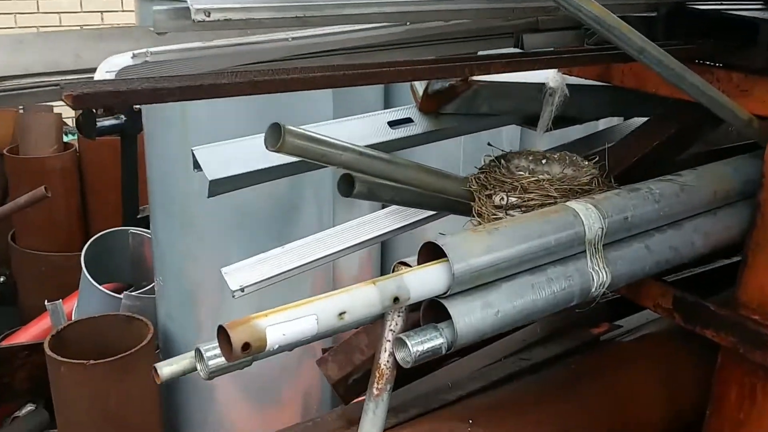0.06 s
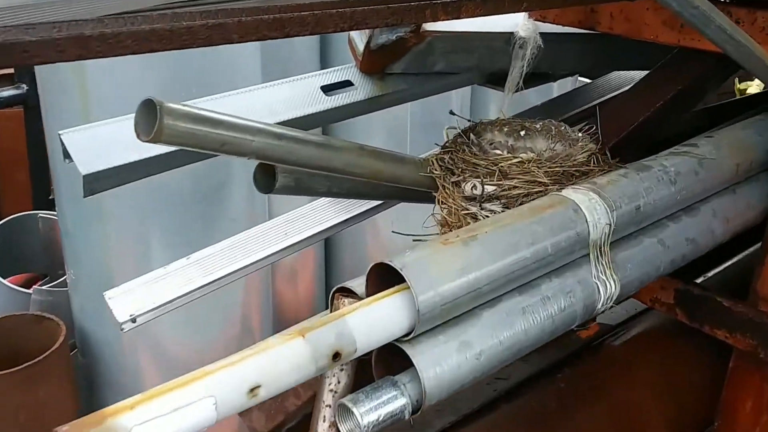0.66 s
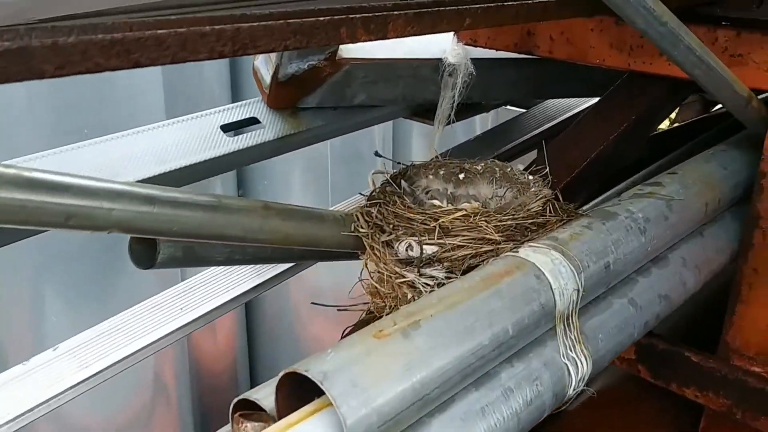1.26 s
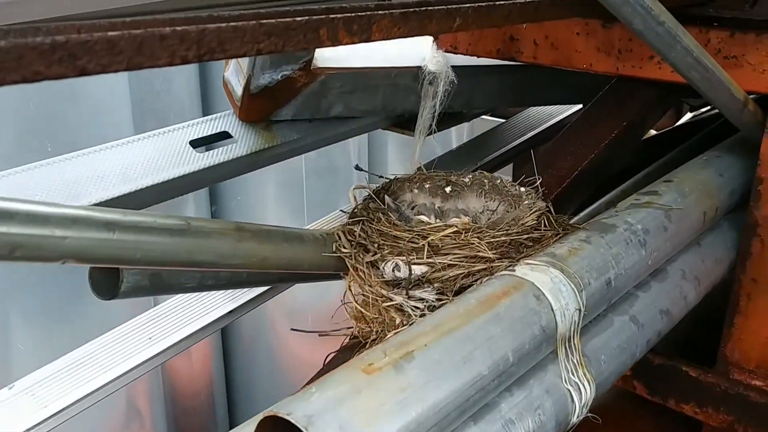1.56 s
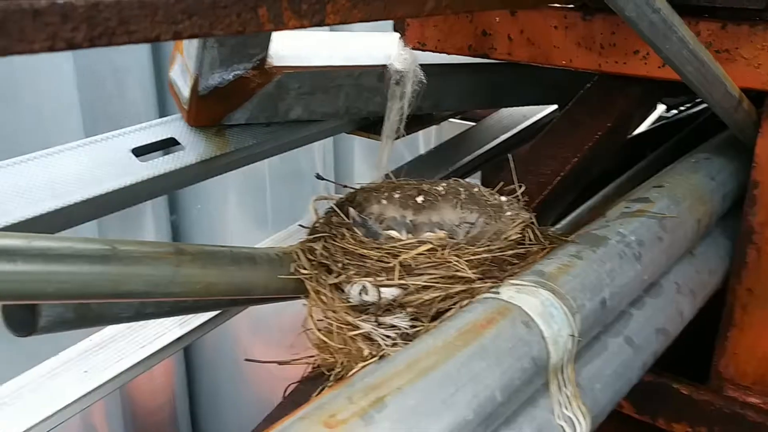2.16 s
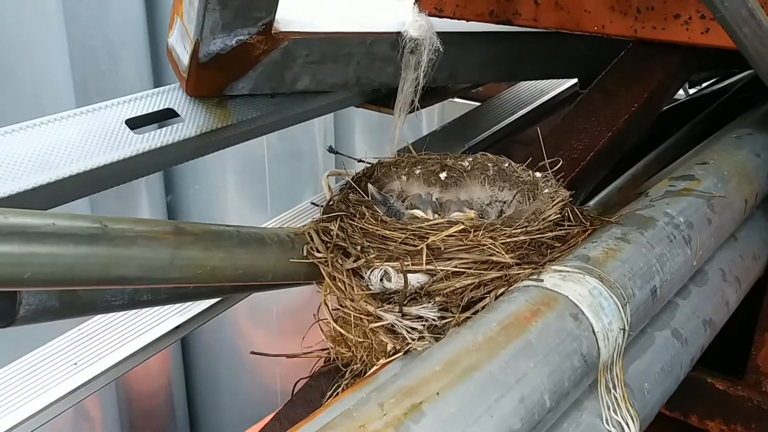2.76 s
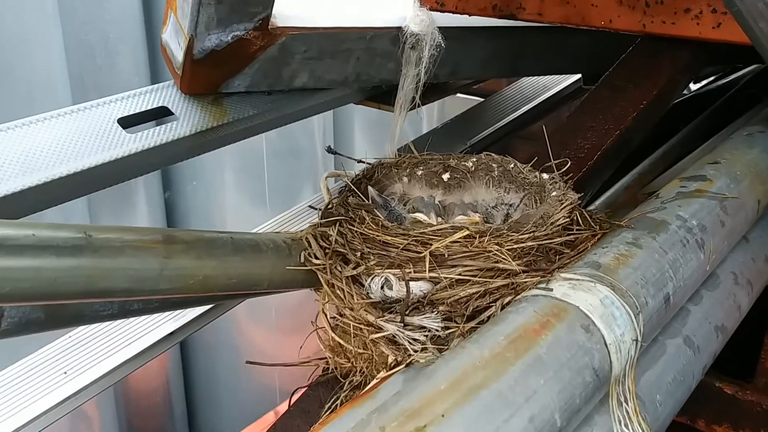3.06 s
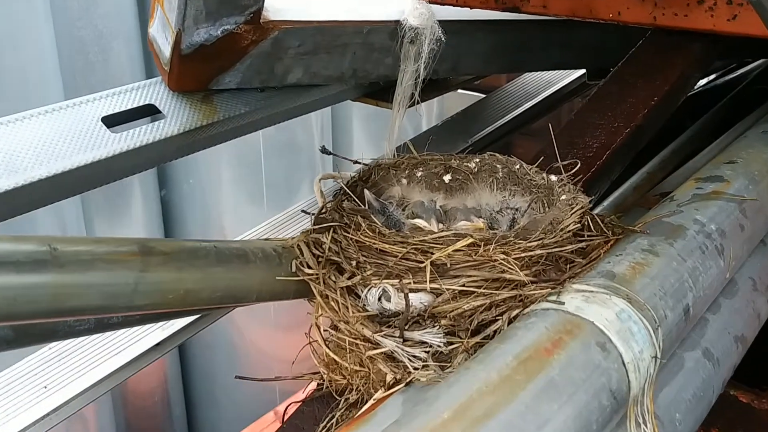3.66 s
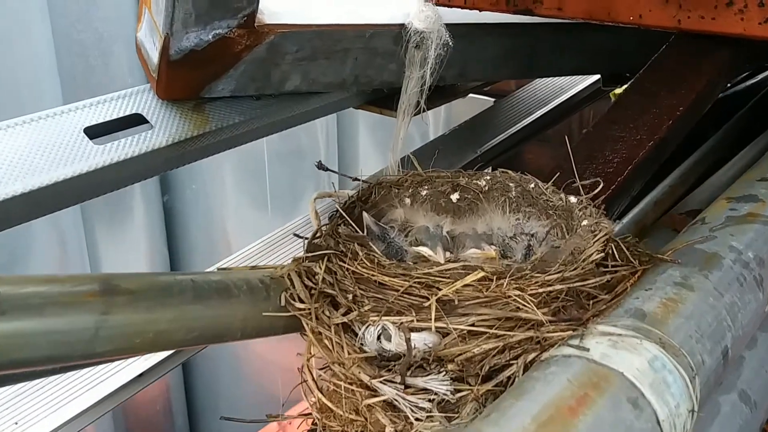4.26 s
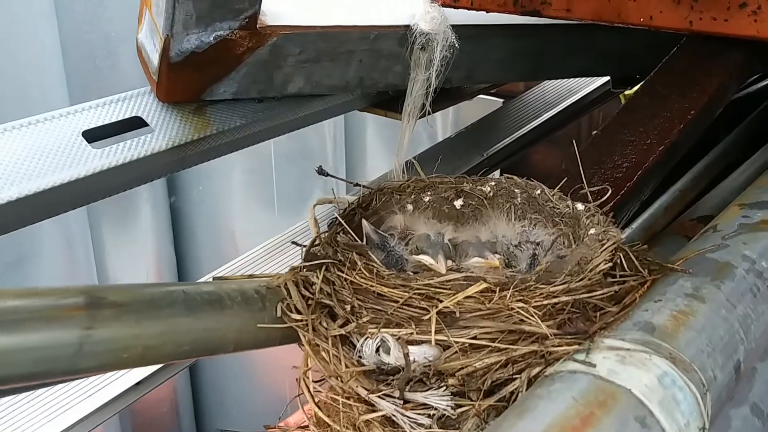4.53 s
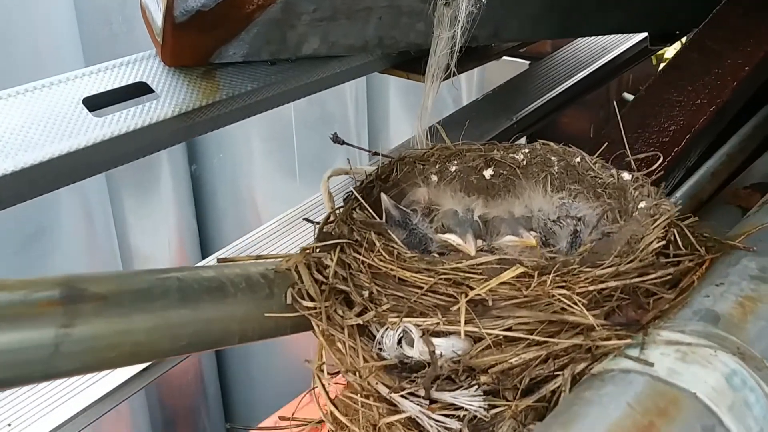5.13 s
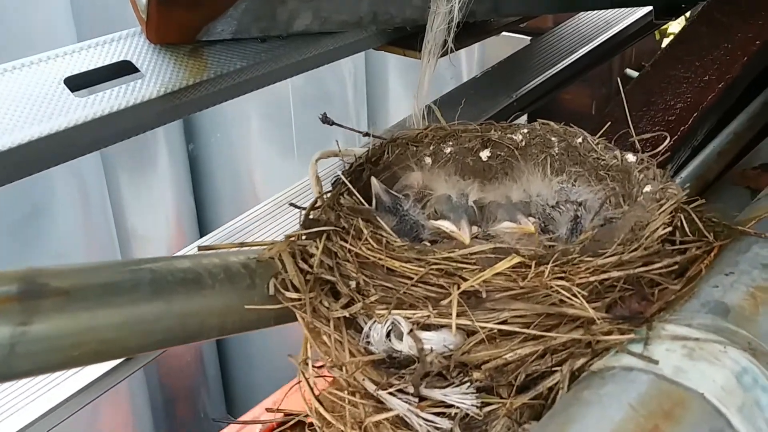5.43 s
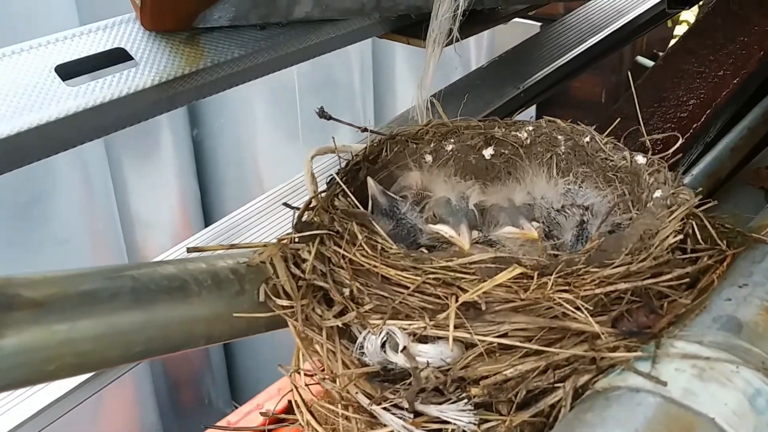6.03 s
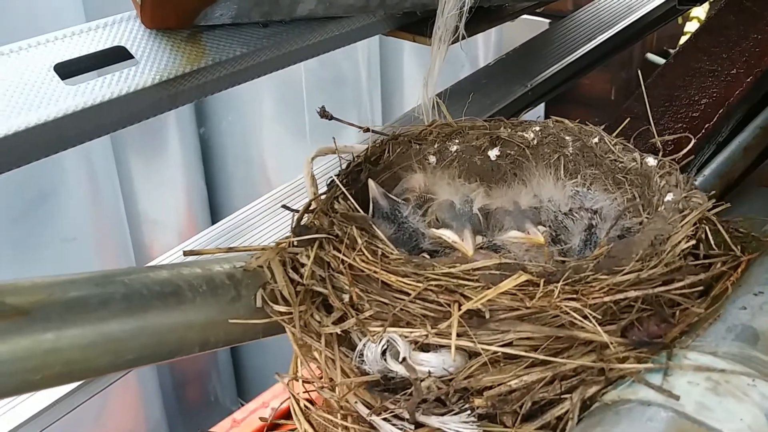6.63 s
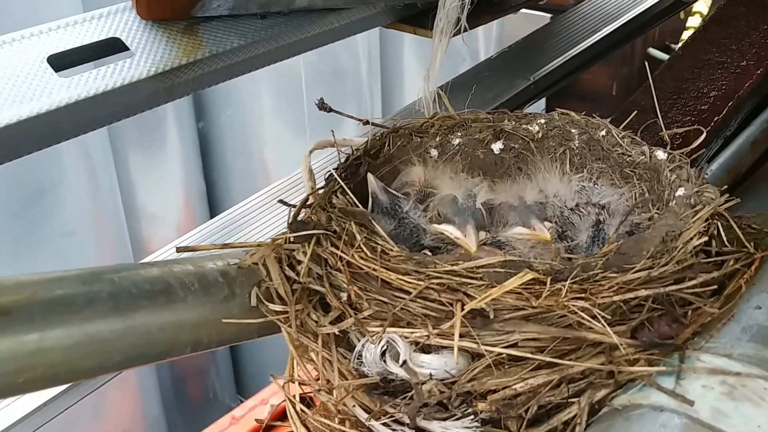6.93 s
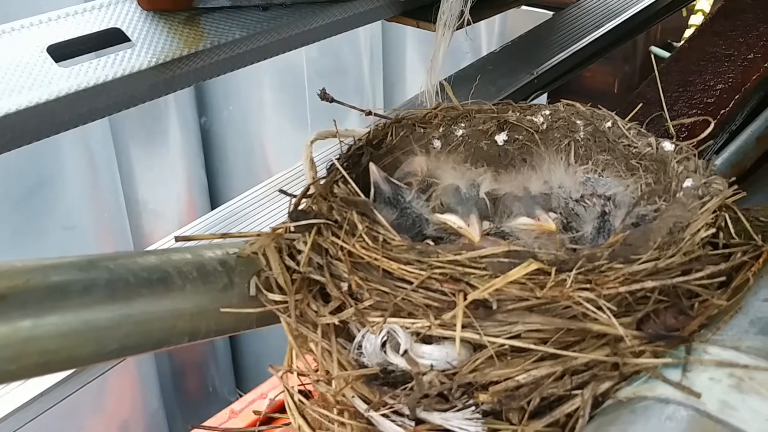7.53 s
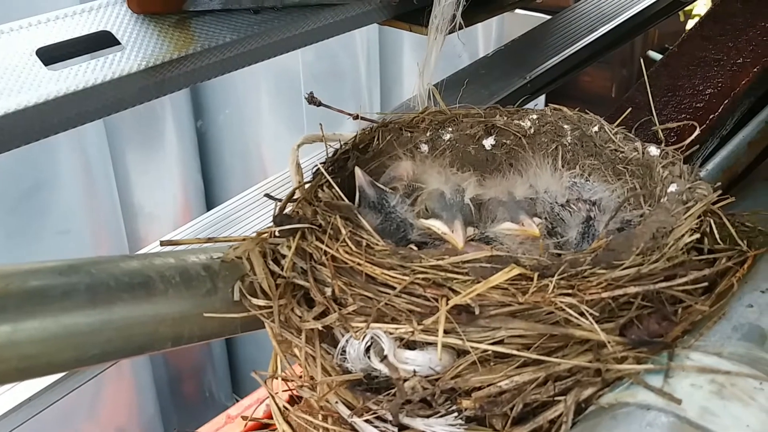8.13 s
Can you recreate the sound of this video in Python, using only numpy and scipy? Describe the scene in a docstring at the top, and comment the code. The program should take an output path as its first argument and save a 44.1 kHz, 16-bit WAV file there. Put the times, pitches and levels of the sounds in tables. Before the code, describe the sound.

Short, piercing bird alarm chirps repeat irregularly close by, with a slight metallic echo and soft far-off traffic behind.

```python
"""Distant traffic, air hiss and a machine hum run throughout. At 0.1 s a robin, near its nest in a rack
of steel pipes and sheets, gives the first of thirteen sharp alarm notes: after a rasp, both sides of
its syrinx sweep up, hold and drop, and the metal throws the note back. Two dry ticks follow. A far
vehicle passes near 1 s; from then on, faint birds and rustles come and go. The loudest notes, in
mid-scene, overload the microphone. The last, at 7.9 s, is the softest."""
import sys
import numpy as np
from scipy import signal
from scipy.fft import rfft, irfft, next_fast_len
from scipy.io import wavfile

SR = 44100
rng = np.random.default_rng(int(sys.argv[2]) if len(sys.argv) > 2 else 0)


def wav_record(signal):
    """Record a signal, one row per channel, as 16-bit PCM in the file named by sys.argv[1]."""
    frames = np.transpose(np.atleast_2d(signal))
    bounded = np.clip(frames, -1, 1)
    # unit amplitude maps onto the largest positive 16-bit level
    quanta = np.round(bounded * 32767).astype(np.int16)
    wavfile.write(sys.argv[1], SR, quanta)


N = 369999

# traffic and air noise: freq_hz, density_db
OUTDOOR_SPECTRUM = [(30, -38), (60, -12), (110, -10.5), (170, -2), (290, 3), (450, -1.5), (750, -1),
                    (1080, -3), (1400, -7.5), (2500, -12), (4200, -12.5), (5300, -18), (7000, -17),
                    (8500, -29), (10000, -43.5), (15000, -66.5)]
# machine hum along the walk up to the nest: pitch_hz, start_db, end_db
HUM_LINES = [(118.4, -62, -60), (173, -57, -58), (346.5, -60, -52), (519, -57, -62), (1040, -59, -60),
             (1082, -57, -63), (2058, -60, -64)]
# far whistles: start_s, length_s, start_hz, end_hz, level_db
FAR_CALLS = [(1.2, 0.062, 3400, 3280, -54.5), (3.846, 0.097, 3090, 3100, -56),
             (7.727, 0.133, 6380, 6090, -57), (7.8, 0.12, 6730, 6750, -57)]
# rustles: centre_s, half_length_s, level_db
RUSTLE_EVENTS = [(3.0, .02, -54), (3.533, 0.03, -45.5), (3.657, .04, -50), (5.83, 0.046, -48),
                 (6.803, 0.037, -55), (7.245, 0.013, -58)]
# rustle noise: freq_hz, density_db
RUSTLE_SPECTRUM = [(3000, -34), (5500, 4), (7000, 3), (9000, -9), (11000, -35), (15000, -55)]
# close ticks: start_s, peak_db
TICK_EVENTS = [(0.2313, -7.5), (0.2966, -19.5)]
# turbulence in the syrinx: freq_hz, density_db
RASP_SPECTRUM = [(1000, -42), (1700, -19), (2800, -13), (4400, 9), (5300, -4.5), (6200, -2.5),
                 (8200, -17.5), (10000, -20.5), (15000, -22.5)]
# alarm notes: start_s, length_s, low_hz, high_hz, low_db, high_db, low_sweep_db, rasp_db
ALARM_NOTES = [(.116, .092, 4232, 7310, -10, -23, -1.5, -20.5),
               (0.967, 0.09, 4192, 7155, -11, -23, 1.5, -25.5),
               (1.877, 0.089, 4298, 7434, -13, -17.5, 2, -24.5), (2.384, 0.09, 4260, 7320, -8, -15, 1, -24),
               (2.835, 0.088, 4243, 7160, -5.8, -14.5, -1.5, -18),
               (3.34, .094, 4178, 6970, -11, -20.5, -2.5, -25.5),
               (4.181, 0.093, 4243, 7280, -10.5, -23, 1, -23.5),
               (4.974, 0.091, 4207, 7206, -7, -22.5, -2, -19),
               (5.655, .094, 4195, 7164, -5.5, -23, -4, -21), (6.37, .098, 4207, 7200, -8, -23.5, -1, -25),
               (6.927, 0.09, 4194, 7190, -9.5, -19.5, 4, -17),
               (7.389, 0.094, 4154, 6940, -12.5, -21.5, 1.5, -23),
               (7.921, 0.1, 4207, 6900, -21, -28, 4.5, -32)]
# pitch and level arch of each side of the syrinx:
# start, sag, floor, jitter (shares of pitch); rise, settle, drop, attack (shares of length);
# attack_db, fade_db, release_db (stage depths); glide_db (gain in sweeps); octave_loss_db (below top)
LOW_ARCH = dict(start=.34, rise=.335, sag=0.04313, settle=0.358, floor=.28, drop=.12, attack=0.34, attack_db=20, fade_db=1, release_db=13.5, glide_db=0, octave_loss_db=5.5, jitter=0.0046)
HIGH_ARCH = dict(start=.29, rise=.34, sag=0.0402, settle=0.595, floor=.4, drop=0.13, attack=0.25, attack_db=20.5, fade_db=8, release_db=26.5, glide_db=5, octave_loss_db=0.5, jitter=0.0058)


def from_db(db):
    """Decibels to gain."""
    return 10 ** (np.asarray(db) / 20)


def decay(t, t60_s):
    """Fall of 60 dB in t60_s."""
    return np.exp(-np.log(1000) * t / t60_s)


def ease(u):
    """Smooth step over u = 0..1."""
    return np.sin(np.pi / 2 * np.clip(u, 0, 1)) ** 2


def add(out, start_s, sound):
    """Mix a sound in from start_s."""
    at = max(round(start_s * SR), 0)
    out[at:at + len(sound)] += sound[:len(out) - at]


def butter(x, order, edges_hz, kind="low"):
    """Butterworth filter."""
    return signal.sosfilt(signal.butter(order, edges_hz, kind, fs=SR, output="sos"), x)


def drift(rate_hz, size):
    """Linear glides between random values."""
    knots = rng.standard_normal(512)
    return np.interp(np.arange(size) / SR * rate_hz, np.arange(len(knots)), knots)


def coloured_noise(spectrum):
    """Noise shaped by (freq_hz, density_db) points; rms 1."""
    hz, db = np.transpose(spectrum)
    size = next_fast_len(N)
    log_hz = np.log(np.fft.rfftfreq(size, 1 / SR) + 1)
    gain = from_db(np.interp(log_hz, np.log(hz), db))
    noise = irfft(rfft(rng.standard_normal(size)) * gain)[:N]
    return noise / np.sqrt(np.mean(noise ** 2))


def traffic(rumble_db=-43.5, tyre_db=-43.5, hiss_db=-42, pass_s=1.15, pass_width_s=2.66, pass_db=5):
    """Steady far rumble and air hiss; tyre noise swells as a vehicle goes by."""
    t, out = np.arange(N) / SR, np.zeros(N)
    spectrum, hz = rfft(coloured_noise(OUTDOOR_SPECTRUM)), np.fft.rfftfreq(N, 1 / SR)
    swell_db = pass_db / (1 + ((t - pass_s) / pass_width_s) ** 2)
    for db, weights in zip((rumble_db, tyre_db + swell_db, hiss_db), np.eye(3)):
        crossover = np.interp(hz, [400, 950, 3500], weights)
        out += from_db(db) * irfft(spectrum * crossover, N)
    return out


def machine_hum(waver_db=3, wander_rad_per_khz=1.75):
    """Wavering tones; the machine's speed wanders and blurs the higher ones."""
    t, out = np.arange(N) / SR, np.zeros(N)
    for pitch_hz, start_db, end_db in HUM_LINES:
        level_db = np.linspace(start_db, end_db, N) + waver_db * drift(5.5, N)
        wander_rad = wander_rad_per_khz * pitch_hz / 1000 * drift(9.2, N)
        out += np.sqrt(2) * from_db(level_db) * np.sin(2 * np.pi * pitch_hz * t + wander_rad)
    return out


def far_birds(smear_t60_s=.22):
    """Faint slurred whistles, smeared by distance."""
    out, t = np.zeros(N), np.arange(SR // 4) / SR
    for start_s, length_s, start_hz, end_hz, level_db in FAR_CALLS:
        size = round(length_s * SR)
        hz = np.linspace(start_hz, end_hz, size) * (1 + .017 * drift(200, size))
        whistle = np.hanning(size) * np.sin(2 * np.pi * np.cumsum(hz) / SR)
        smeared = signal.fftconvolve(whistle, rng.standard_normal(len(t)) * decay(t, smear_t60_s))
        add(out, start_s, from_db(level_db) * smeared * np.sqrt(size) / np.linalg.norm(smeared))
    return out


def rustles():
    """Soft, short brushes of high noise."""
    envelope = np.zeros(N)
    for centre_s, half_length_s, level_db in RUSTLE_EVENTS:
        swell = np.hanning(round(2 * half_length_s * SR))
        add(envelope, centre_s - half_length_s, from_db(level_db) * swell)
    return envelope * coloured_noise(RUSTLE_SPECTRUM)


def ticks(band_hz=6250, snap_t60_s=.0013, tail_db=-49, tail_t60_s=.047):
    """Tiny dry noise snaps with a faint tail."""
    out, t = np.zeros(N), np.arange(SR // 20) / SR
    envelope = decay(t, snap_t60_s) + from_db(tail_db) * decay(t, tail_t60_s)
    for start_s, peak_db in TICK_EVENTS:
        snap = butter(rng.standard_normal(len(t)) * envelope, 2, [.69 * band_hz, 1.22 * band_hz], "band")
        add(out, start_s, from_db(peak_db) * snap / np.abs(snap).max())
    return out


def rack_response(facing_db, sheet_delay_s=.012, pipe_t60_s=.19, yard_t60_s=.59, beam_hz=2800):
    """Direct treble beamed by the beak, plus echoes off near sheets, pipes and the dull yard."""
    t = np.arange(SR * 3 // 4) / SR
    pipes, yard = rng.standard_normal((2, len(t)))
    pipes = pipes * decay(t, pipe_t60_s) * (1 - np.exp(-t / .0003))
    yard = yard * decay(t, yard_t60_s) * (1 - np.exp(-t / .019))
    echoes = from_db(2.14) * pipes / np.linalg.norm(pipes)
    echoes += from_db(-15) * butter(yard / np.linalg.norm(yard), 3, [1000, 7500], "band")
    sheet_taps = (rng.uniform(.1, 1, size=5) * sheet_delay_s * SR).astype(int)
    echoes[sheet_taps] += from_db(-10.5) * rng.choice([-1, 1], size=5)
    direct = butter(signal.unit_impulse(len(t)) + 1e-18, 2, beam_hz, "high")
    return direct + from_db(-facing_db) * echoes


def beak(x, cutoff_hz=8580, leak_db=-16.5):
    """Lets little out above the high voice."""
    return butter(x, 8, cutoff_hz) + from_db(leak_db) * x


def rasp(phase, air, buzz_db=-19, breath_db=-20.5):
    """Membranes buzz and the air breaks up as a note opens; faint breath stays on."""
    along = np.linspace(0, 1, len(phase))
    opening = np.minimum(along / .11, 1) ** .48 * np.exp(-(along / .29) ** 4)
    buzz = sum(np.sin(k * phase) for k in range(2, 5)) * np.exp(-(along / .19) ** 4)
    breath = from_db(breath_db) * air * signal.windows.tukey(len(phase), .4)
    return opening * (air + from_db(buzz_db) * buzz) + breath


def syrinx_side(length_s, top_hz, sweep_db, start, rise, sag, settle, floor, drop, attack,
                attack_db, fade_db, release_db, glide_db, octave_loss_db, jitter, hold_end=.8):
    """Phase and envelope of one whistle: rises, sags while held, drops; unsteady in the sweeps."""
    size = round(length_s * SR)
    along = np.linspace(0, 1, size)
    rising = start + (1 - start) * ease(along / rise)
    sagging = 1 - sag * ease((along - rise) / settle)
    dropping = floor + (1 - floor) * np.exp(-np.maximum(along - hold_end, 0) / drop)
    pitch_ratio = rising * sagging * dropping
    gliding = np.clip((1 - rising * dropping) / .15, 0, 1)
    flutter = (jitter + .035 * gliding) * drift(899.7, size)
    waver = .0029 * drift(68, size)
    hz = top_hz * pitch_ratio * (1 + flutter + waver)
    stage_db = np.interp(along, [0, attack, hold_end, 1], [-attack_db, 0, -fade_db, -fade_db - release_db])
    level_db = stage_db + (sweep_db + glide_db) * gliding + octave_loss_db * np.log2(pitch_ratio)
    return 2 * np.pi * np.cumsum(hz) / SR, from_db(level_db) * signal.windows.tukey(size, .05)


def robin(swell_db=4.5, octave_db=-17.5, sum_db=-17, difference_db=-12):
    """Two whistles per note, with weak octaves; their shared airflow adds sum and difference tones."""
    out, turbulence = np.zeros(N), coloured_noise(RASP_SPECTRUM)
    for start_s, length_s, low_hz, high_hz, low_db, high_db, low_sweep_db, rasp_db in ALARM_NOTES:
        low_phase, low_env = syrinx_side(length_s, low_hz, low_sweep_db, **LOW_ARCH)
        high_phase, high_env = syrinx_side(length_s, high_hz, 0, **HIGH_ARCH)
        size = len(low_phase)
        mid_swell = from_db(swell_db * np.exp(-((np.linspace(0, 1, size) - .57) / .25) ** 2))
        low = mid_swell * low_env * np.sin(low_phase)
        high = high_env * np.sin(high_phase)
        octaves = np.sqrt(low_env) * np.sin(2 * low_phase) + np.sqrt(high_env) * np.sin(2 * high_phase)
        sum_tone = from_db(sum_db) * np.sin(high_phase + low_phase)
        difference_tone = from_db(difference_db) * np.sin(high_phase - low_phase)
        mixing = np.sqrt(high_env) * low_env * (sum_tone + difference_tone)
        # bird and microphone move: new echoes per note; loud notes face the microphone, so are drier
        response = rack_response(facing_db=1.14 * max(low_db + 13, -2.5))
        # voice levels include echoes, taken over half the note's length
        low_gain, high_gain = (
            from_db(db) * np.sqrt(size / 2) / np.linalg.norm(signal.fftconvolve(voice, response))
            for db, voice in ((low_db, low), (high_db, high)))
        air = turbulence[round(start_s * SR):][:size]
        note = low_gain * low + high_gain * (high + from_db(octave_db) * octaves + mixing)
        note += from_db(rasp_db) / np.linalg.norm(response) * rasp(low_phase, air)
        add(out, start_s, signal.fftconvolve(beak(note), response))
    return out


def scene():
    """The robin over the quiet yard; mono."""
    return (robin() + far_birds() + ticks() + rustles() + traffic() + machine_hum())[None]


def record(dry, port_hz=5330, port_db=-9.5, ceiling=.38, emphasis=.56):
    """Microphone: port dip, overload under treble lift, loss of deep bass and top."""
    notched = signal.lfilter(*signal.iirnotch(port_hz, Q=7, fs=SR), dry)
    dipped = notched + from_db(port_db) * (dry - notched)
    lift = [1, -emphasis]
    bright = signal.lfilter(lift, [1], dipped)
    # overload mixes the two voices into a short low blip
    oversampled = signal.resample_poly(bright, 4, 1, axis=-1)
    clipped = oversampled / (1 + np.abs(oversampled / ceiling) ** 24) ** (1 / 24)
    out = signal.resample_poly(clipped, 1, 4, axis=-1)
    out = signal.lfilter([1], lift, out)
    out = butter(out, 3, 10600)
    out = butter(out, 4, 72, "high")
    return signal.sosfilt(signal.ellip(10, .1, 80, 15800, fs=SR, output="sos"), out)


dry = scene()
out = record(dry)
wav_record(out)
```